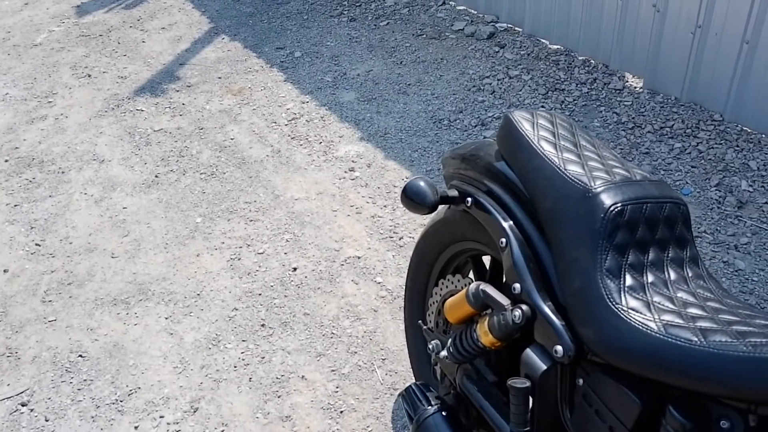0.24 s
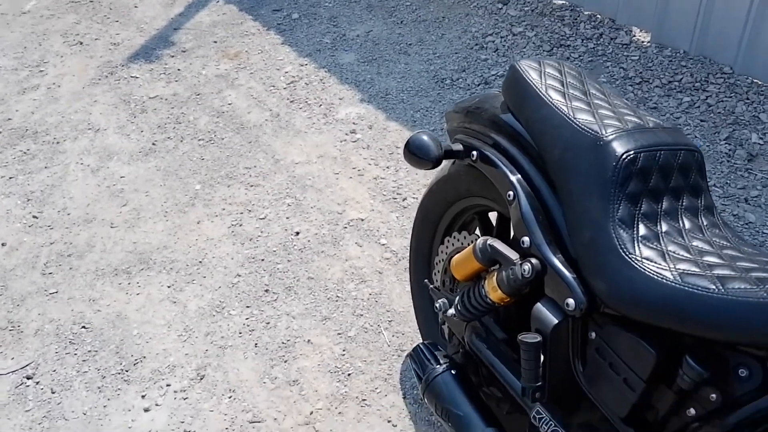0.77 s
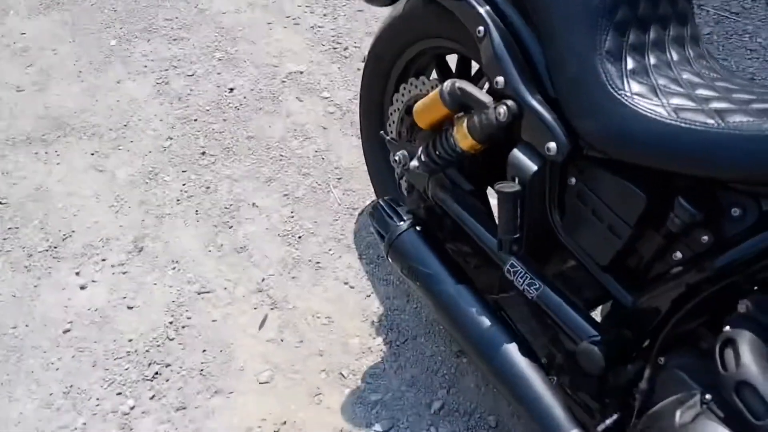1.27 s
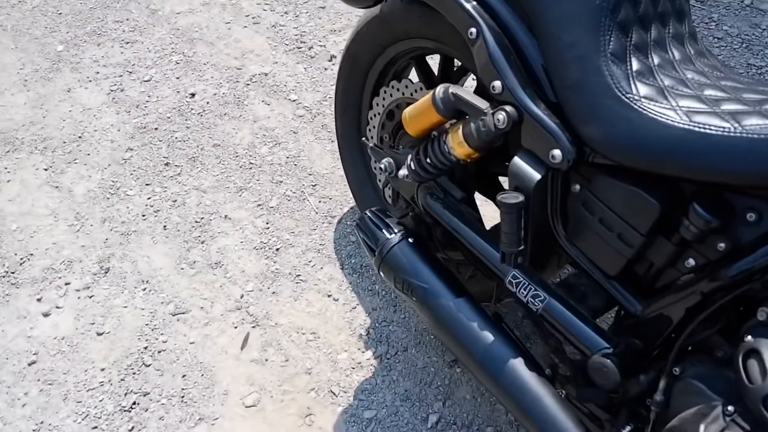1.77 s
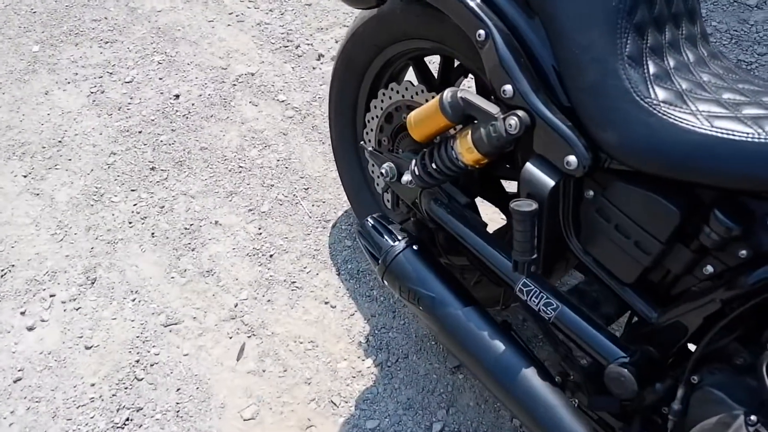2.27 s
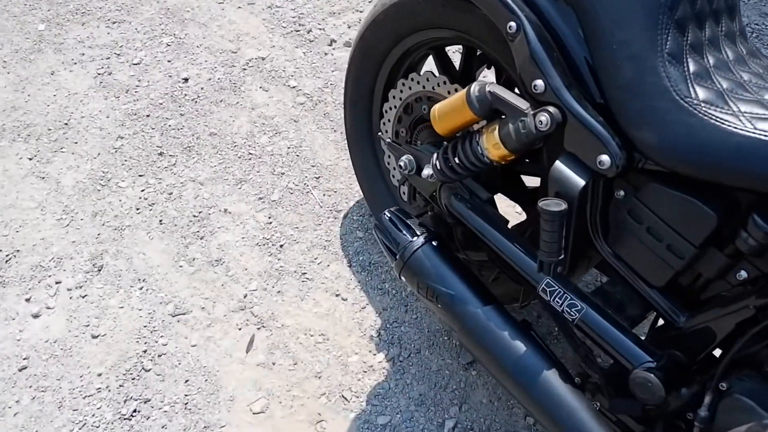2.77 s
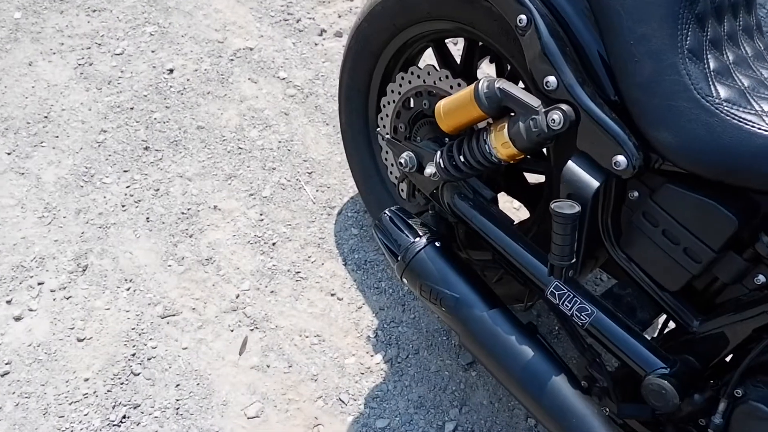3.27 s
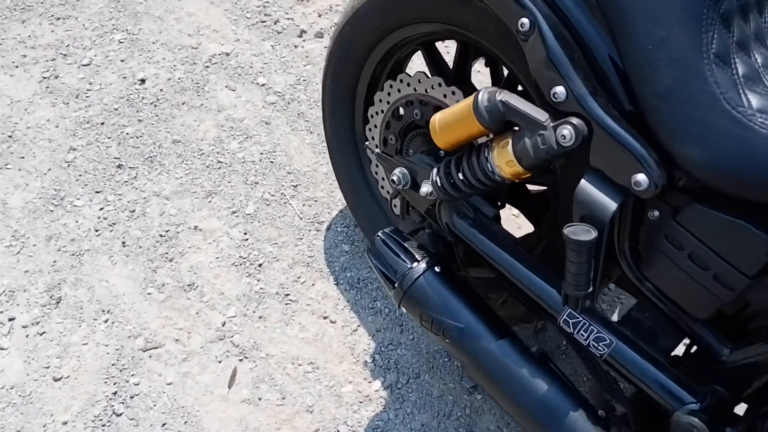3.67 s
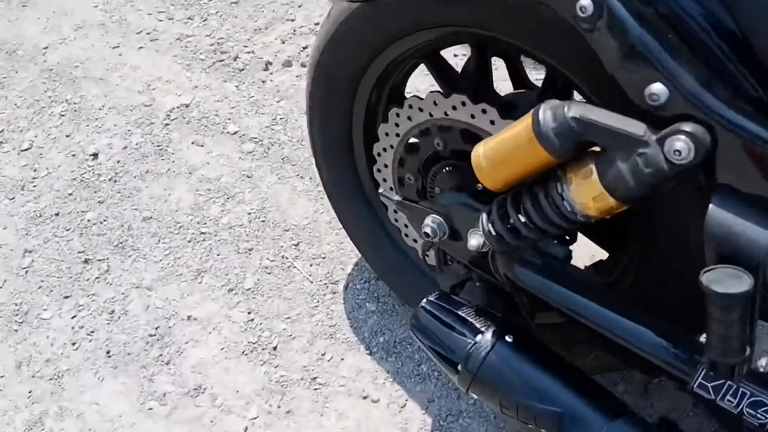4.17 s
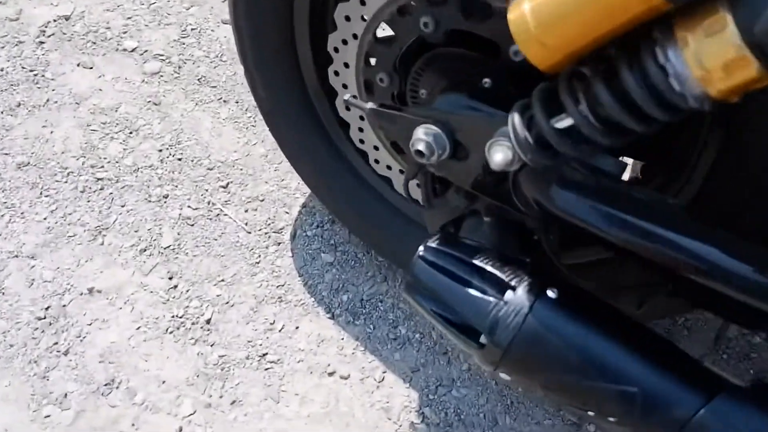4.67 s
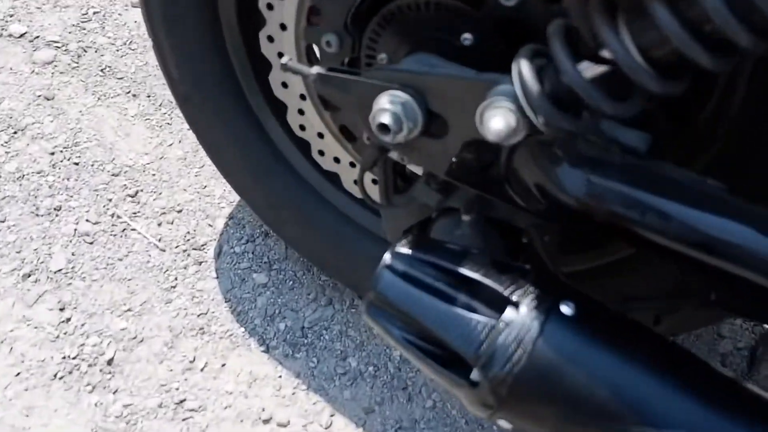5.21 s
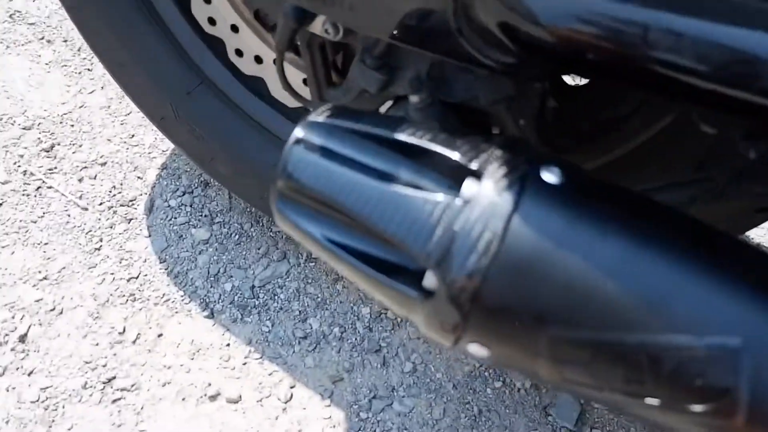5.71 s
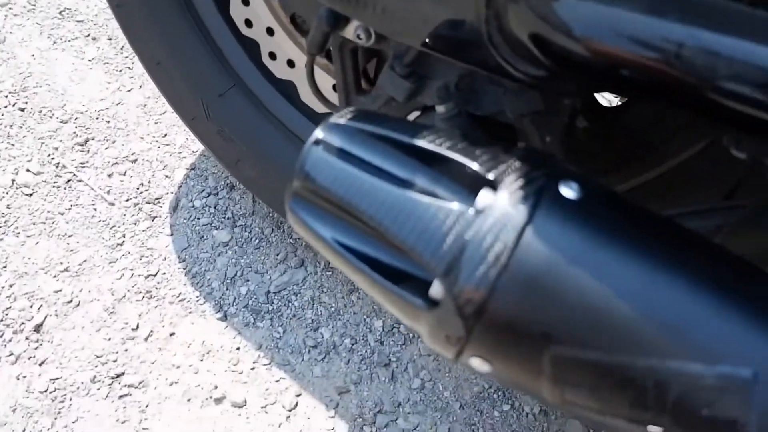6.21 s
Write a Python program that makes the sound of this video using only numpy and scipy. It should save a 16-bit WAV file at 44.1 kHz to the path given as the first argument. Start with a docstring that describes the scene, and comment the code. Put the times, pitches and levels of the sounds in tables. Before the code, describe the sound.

Close exhaust sound of a big twin-cylinder motorcycle: deep booms with hard barks and raspy gas. It is revved briefly, drops to a lumpy idle, then is blipped twice in a row to a low drone. A long crackling rundown follows before slow, irregular idle beats with occasional sputters. The open yard gives only faint, dull echoes; light mechanical ticking and hiss sit behind.

```python
"""A V-twin motorcycle stands on gravel beside a fence, heard from near the tip of its open muffler.
The throttle is blipped three times; the engine cracks, runs down with pops and settles into an uneven idle.
Each firing rings the pipe in a boom, a bark from its steep front and a rasp of gas; bangs lead with a shock.
Gas rumbles on between them, burbles and sputters through the muffler, and pushes at speed merge into a drone.
Behind it the valves tap, the fins sing, the intake hisses and air washes round the pipe; the yard echoes."""
import sys
import numpy as np
from scipy import signal
from scipy.fft import rfft, irfft, next_fast_len
from scipy.io import wavfile

SR = 44100
rng = np.random.default_rng(int(sys.argv[2]) if len(sys.argv) > 2 else 0)


def wav_record(signal):
    """Record a signal, one row per channel, as 16-bit PCM in the file named by sys.argv[1]."""
    frames = np.transpose(np.atleast_2d(signal))
    bounded = np.clip(frames, -1, 1)
    # unit amplitude maps onto the largest positive 16-bit level
    quanta = np.round(bounded * 32767).astype(np.int16)
    wavfile.write(sys.argv[1], SR, quanta)


N = 284439

# crank speed: (time [s], speed [rpm])
CRANK_SPEED = [(0.0, 1100), (0.12, 1624), (0.18, 2459), (0.47, 2221), (0.96, 1630), (1.34, 1310),
               (1.59, 1118), (1.79, 1516), (2.05, 3261), (2.21, 3601), (2.58, 2651), (2.75, 2865),
               (2.82, 3578), (2.93, 3712), (3.45, 2503), (4.32, 1290), (4.49, 1059), (5.09, 1009),
               (5.3, 1143), (5.43, 1053), (6.45, 1104)]
# gas pushes of the two cylinders in one cycle of two turns: (share at idle [cycle], share at revs [cycle],
# boom at idle [dB], boom at revs [dB], bark and rasp at idle [dB], bark and rasp at revs [dB])
FIRING_PUSHES = [(0, 0.017, 2, -1.5, -6, -4.5), (.42, .44, 1.5, 0, -8, -5.5)]
# throttle blips: (opens [s], shut [s], easing off [s], strength [dB], starving afterwards [dB])
THROTTLE_BLIPS = [(0.049, 0.229, 0.018, -3, -8), (1.7, 2.144, 0.054, -4, -6.5),
                  (2.687, 2.859, 0.026, -0.5, -7.5)]
# strength of a firing, throttle shut: (speed [rpm], boom [dB], bark [dB], rasp [dB])
SHUT_STRENGTH = [(1170, -13, -33, -35), (1350, -14, -40.5, -36.5), (1700, -12, -33.5, -36.5),
                 (2380, -13, -30.5, -34), (2630, -14, -36.5, -36.5), (3130, -13, -23.5, -30.5)]
# nearness of the microphone to the muffler: (time [s], exhaust level [dB])
MIC_NEARNESS = [(0, 8.5), (.6, -8), (1.2, 6.5), (4, -3), (4.9, 6), (6.45, 5)]
# firings sink and gas churns on the overrun: (speed [rpm], firing [dB], rumble re boom [dB])
OVERRUN_LEVELS = [(1130, -0.5, -15.5), (1227, -11.5, -6), (2020, -0.5, -3.5), (2520, -3, -15),
                  (3000, -3.5, -13.5)]
# level of the top end and intake hiss: (time [s], level [dB])
HISS_LEVEL = [(0, -15.5), (.55, -32.5), (1.45, -18.5), (2.05, -23), (2.7, -26.5), (3.2, -24), (4.4, -26),
              (5.3, -25), (5.65, -31), (6.45, -27.5)]
BOOM_VARY_DB, TIP_VARY_DB = 1.8, 3.5  # scatter of each mode from push to push


def from_db(db):
    """Amplitude factor of a level in dB."""
    return 10 ** (np.asarray(db) / 20)


def to_db(amplitude):
    """Level in dB of an amplitude factor."""
    return 20 * np.log10(amplitude)


def rms_one(x):
    """Scale a signal to an rms of one."""
    return x / np.sqrt(np.mean(x ** 2) + 1e-20)


def read(rows, at):
    """The columns of a curve, interpolated over its first column."""
    knots, *columns = np.transpose(rows)
    return [np.interp(at, knots, column) for column in columns]


def by_speed(rows, times):
    """The columns of a table over crank speed at the given times."""
    return np.array(read(rows, read(CRANK_SPEED, times)[0]))


def colour(x, spectrum):
    """Shape a signal by a spectrum in dB, interpolated over log frequency."""
    hz, db = np.transpose(spectrum)
    size = next_fast_len(N + 4096)
    bins = np.maximum(np.fft.rfftfreq(size, 1 / SR), 1)
    gain = from_db(np.interp(np.log(bins), np.log(hz), db))
    return irfft(rfft(x, size) * gain, size)[..., :N]


def noise(spectrum):
    """Coloured noise with an rms of one."""
    return rms_one(colour(rng.standard_normal(N), spectrum))


def stereo_noise(spectrum):
    """Coloured noise whose side signal, opposite left and right, has a spectrum of its own."""
    # width of the gas and engine noise: (frequency [Hz], side re mid [dB])
    width = [(100, -24), (500, -41.5), (1000, -16.5), (2000, -13), (4000, -15.5), (8000, -2), (12000, 4.5)]
    middle = noise(spectrum)
    side = colour(noise(spectrum), width)
    return middle + side * [[1], [-1]]


def lowpass(x, hz, order=2):
    """Take away what lies above a frequency."""
    return signal.sosfilt(signal.butter(order, min(hz, .45 * SR), fs=SR, output="sos"), x)


def highpass(x, hz, order):
    """Take away what lies below a frequency."""
    return signal.sosfilt(signal.butter(order, hz, "high", fs=SR, output="sos"), x)


def clicks(times, db):
    """One click of the given level at each time."""
    out = np.zeros(N)
    at = np.round(times * SR).astype(int)
    inside = (at >= 0) & (at < N)
    np.add.at(out, at[inside], from_db(db)[inside])
    return out


def play(train, response):
    """Sound a response at every click."""
    return signal.fftconvolve(train, response)[:N]


def puff_rms(response):
    """The rms of a response over its first 12 ms."""
    return np.sqrt(np.mean(response[:int(.012 * SR)] ** 2))


def pipe(times, db, modes, front_hz, order=2, vary_db=0):
    """Modes ring after each pressure front; a low front_hz is a soft front, and each favours other modes."""
    front = signal.unit_impulse(SR // 4)
    rings = []
    for hz, width, mode_db in modes:
        r = np.exp(-np.pi * width / SR)
        resonator = [1, -2 * r * np.cos(2 * np.pi * hz / SR), r * r]
        ring = signal.lfilter([1 - r * r, 0, r * r - 1], resonator, front + 1e-18)
        rings.append(from_db(mode_db) * lowpass(ring, front_hz, order))
    favour_db = vary_db * rng.standard_normal((len(times), len(modes))).T
    sounding = sum(play(clicks(times, db + own_db), ring) for own_db, ring in zip(favour_db, rings))
    return sounding / puff_rms(sum(rings))


def crank():
    """Engine cycles completed at each sample: the running sum of crank speed, two turns to a cycle."""
    start_cycle = -.16
    return start_cycle + np.cumsum(read(CRANK_SPEED, np.arange(N) / SR)[0]) / (2 * 60 * SR)


def crank_times(share):
    """When the crank passes this share of each cycle."""
    cycles = crank()
    return np.interp(np.arange(share, cycles[-1]), cycles, np.arange(N) / SR)


def revving(times):
    """0 at idle, 1 at high revs."""
    idle_rpm, rev_rpm = 1100, 2400
    return np.clip((read(CRANK_SPEED, times)[0] - idle_rpm) / (rev_rpm - idle_rpm), 0, 1)


def valve_times(share_idle, share_revs):
    """When a push leaves; at idle each firing speeds the crank up, so the next push comes early."""
    times = crank_times(max(share_idle, 0))
    cycle_s = 2 * 60 / read(CRANK_SPEED, times)[0]
    return times + (share_revs - share_idle) * revving(times) * cycle_s


def throttle(times):
    """Throttle opening from 0, shut, through a ramp up and a ramp down at each blip; 1 is wide open."""
    opening_s = .055
    opening = 0
    for opens, shut, easing, db, _ in THROTTLE_BLIPS:
        ramps = np.minimum((times - opens) / opening_s, (shut - times) / easing)
        opening = opening + from_db(db) * np.clip(ramps, 0, 1)
    return opening


def coasting_db(times):
    """Exhaust level by nearness; the cylinders starve for a moment after the throttle snaps shut."""
    starve_s = .097
    starved_db = 0
    for _, shut, _, _, db in THROTTLE_BLIPS:
        starved_db = starved_db + db * (times > shut) * np.exp(-np.abs(times - shut) / starve_s)
    return starved_db + read(MIC_NEARNESS, times)[0]


def misfire_db(times):
    """A charge that catches weakly or not at all weakens its firing and the afterpuff behind it."""
    # weak firings: (time [s], change of level [dB])
    weak_firings = [(0.017, -0.5), (1.255, -1), (1.73, -34), (4.28, -28), (4.385, -34), (4.433, -3),
                    (4.546, -28), (4.708, -8.5), (4.94, -19), (5.174, -6.5), (5.392, -7), (5.565, -7),
                    (5.62, -15), (5.682, -5)]
    return sum(db * (np.abs(times - s - .009) < .016) for s, db in weak_firings)


def unevenness(times):
    """Share of the scatter: coasting fast, the engine only pumps air evenly; burning charges always vary."""
    # scatter left off the throttle: (speed [rpm], share [1])
    scatter_left = [(1150, .85), (1400, 1), (2450, 1), (2800, .25)]
    return np.maximum(by_speed(scatter_left, times)[0], throttle(times))


def pushes(pattern, scatter_s):
    """Times and levels (boom, bark, rasp) of the pushes that the turning crank lets out."""
    burn_vary_db, gas_vary_db = 1.5, 2.8  # scatter from one charge to the next
    rows = []
    for share_idle, share_revs, boom_idle, boom_revs, edge_idle, edge_revs in pattern:
        times = valve_times(share_idle, share_revs)
        revs = revving(times) ** 2
        boom, bark, rasp = by_speed(SHUT_STRENGTH, times) + coasting_db(times) + misfire_db(times)
        push = boom_idle + revs * (boom_revs - boom_idle)
        edge = edge_idle + revs * (edge_revs - edge_idle)
        scatter = rng.standard_normal((len(times), 3)) * [scatter_s, burn_vary_db, gas_vary_db]
        late_s, burn_db, gas_db = scatter.T
        uneven = unevenness(times)
        rows.append([times + uneven * late_s,
                     boom + push + uneven * burn_db,
                     bark + edge + uneven * burn_db,
                     rasp + edge + gas_db])
    return np.hstack(rows)


def full_charges():
    """Times and levels (boom, bark, rasp) of the firings under open throttle and of the single loud bangs."""
    # strength of a firing, throttle open: (speed [rpm], boom [dB], bark [dB], rasp [dB])
    open_strength = [(1210, -8.5, -15, -27), (2540, -19, -18.5, -31), (4430, -21.5, -14, -37)]
    # single loud bangs: hard firings, strong idle beats and pops in the pipe:
    # (time [s], boom [dB], bark [dB], rasp [dB])
    single_bangs = [(0.056, -10, -31, -56), (0.135, -36, -22, -45), (0.19, -30, -23, -36),
                    (0.351, -24, -37, -49.5), (.395, -30, -47, -51), (0.531, -29, -42, -51),
                    (0.555, -22.5, -34, -52), (0.732, -20, -32, -60), (1.174, -16, -38, -53.5),
                    (1.216, -13.5, -40, -69), (1.395, -12.5, -37, -60), (1.491, -8.5, -39, -55),
                    (1.599, -11.5, -48, -44), (1.679, -21, -20.5, -45), (1.694, -9.5, -13.5, -35.5),
                    (1.851, -33, -14.5, -40), (1.876, -35, -35, -46), (2.157, -43, -18.5, -65),
                    (2.529, -17, -23.5, -69), (2.576, -17, -40, -46.5), (2.622, -16, -48, -44.5),
                    (2.707, -11, -22, -66), (2.775, -35, -20.5, -41.5), (3.243, -15.5, -52, -45),
                    (3.288, -18, -29, -42.5), (3.33, -16.5, -36, -44), (3.416, -18, -43, -42.5),
                    (3.464, -15.5, -38, -41.5), (3.512, -19, -39, -43), (3.617, -16.5, -42, -42),
                    (3.795, -18.5, -33.5, -48), (3.91, -16, -36, -46.5), (4.044, -18, -44, -47.5),
                    (3.969, -15, -30, -52), (4.157, -10.5, -20.5, -43.5), (4.192, -10, -23, -39),
                    (4.335, -19, -30.5, -48.5), (4.478, -11.5, -32, -47.5), (4.822, -9.5, -44, -45.5),
                    (5.058, -11, -49, -43), (5.344, -11, -36, -59), (5.5, -8.5, -27.5, -43.5),
                    (5.796, -12.5, -25, -49.5), (6.018, -13, -31, -56)]
    powers = [.29, .34, 2.3]  # a part-open throttle gives this power of the full boom, bark and rasp
    times = np.concatenate([valve_times(*firing[:2]) for firing in FIRING_PUSHES])
    times = times[throttle(times) > .1]
    opening_db = to_db(throttle(times))
    levels = by_speed(open_strength, times) + np.outer(powers, opening_db) + misfire_db(times)
    return np.hstack([np.vstack([times, levels]), np.transpose(single_bangs)])


def booms(times, db, ringing_db):
    """The thud of the pipe and its longer ring; a push lasts a fixed crank angle, so it is shorter at speed."""
    # pipe resonances under long, slow pushes: (frequency [Hz], width [Hz], level [dB])
    slow_modes = [(66, 4.8, -2), (134, 36, 6.5), (166.5, 31, 3), (224.5, 150, 2.5), (305, 13, -16)]
    # pipe resonances under short, fast pushes: (frequency [Hz], width [Hz], level [dB])
    fast_modes = [(122.5, 37, 11), (193, 110, 5), (258, 120, 1), (328, 26, 7.5)]
    # standing wave in the pipe: (speed [rpm], long ring re boom [dB])
    standing_wave = [(990, -9.5), (1240, -2.5), (1900, -9.5), (2110, -21.5), (3170, -13.5)]
    ring_loss_per_db = 1.5  # close to the tip the direct thud drowns the ring
    revs = np.clip(revving(times), .001, .999)
    vary_db = BOOM_VARY_DB * unevenness(times)
    slow = pipe(times, db + to_db(1 - revs), slow_modes, front_hz=238.3, order=4, vary_db=vary_db)
    fast = pipe(times, db + to_db(revs), fast_modes, front_hz=307.4, order=4, vary_db=vary_db)
    fast = highpass(fast, 85, order=2)  # short pushes carry little deep bass
    near_db = read(MIC_NEARNESS, times)[0]
    ring_db = ringing_db + by_speed(standing_wave, times)[0] - ring_loss_per_db * near_db
    ring = pipe(times, db + ring_db, [(142.4, 1.93, 0)], front_hz=220)
    return -(slow + fast + ring)


def barks(times, db, front_hz, idle_db, tip_db, idle_tip_db):
    """A steep front rings the higher pipe modes; at idle the knock of the end can takes over."""
    # pipe resonances under a steep front: (frequency [Hz], width [Hz], level [dB])
    bark_modes = [(336.5, 24, 4), (445, 22.4, 13), (512, 90, 2), (574, 32, 1.5)]
    # the end can of the muffler at revs: (frequency [Hz], width [Hz], level [dB])
    tip_modes = [(851, 98, 8.5), (1026, 130, 3.5), (1622, 95, 7.5), (2500, 150, 1.5)]
    # knock of the end can at idle: (frequency [Hz], width [Hz], level [dB])
    knock_modes = [(793, 65, 7), (935, 45, 8), (1240, 67, 9.5), (1700, 39, -1.5)]
    idling = np.clip((1 - revving(times)) ** 3, .001, .999)
    uneven = unevenness(times)
    body = pipe(times, db + idle_db * idling, bark_modes, front_hz, order=6, vary_db=BOOM_VARY_DB * uneven)
    at_tip = times + .00077
    revs_db = db + tip_db + 10 * np.log10(1 - idling)
    tip = pipe(at_tip, revs_db, tip_modes, front_hz=1600, vary_db=TIP_VARY_DB * uneven)
    knock_db = db + idle_tip_db + 10 * np.log10(idling)
    knock = pipe(at_tip, knock_db, knock_modes, front_hz=1630, vary_db=TIP_VARY_DB * uneven)
    return body + tip + knock


def jet(times, db, decay_s):
    """Bursts of turbulence that swell as the valve cracks open and die after each push."""
    # turbulent gas at the tip: (frequency [Hz], density [dB per Hz])
    gas_spectrum = [(60, -32.5), (300, 5), (600, -5), (950, 4), (1300, -1), (1620, 5.5), (1950, -2.5),
                    (2550, 3), (3100, -4.5), (3700, -7), (4400, -5), (5300, -7.5), (7500, -14),
                    (9000, -23.5), (11500, -23.5)]
    t = np.arange(SR // 10) / SR
    swell = 1 / (1 + np.exp((.003 - t) / .0006))
    burst = swell * np.exp(-t / decay_s)
    burst_power = (burst / puff_rms(burst)) ** 2
    gas_power = play(clicks(times - .002, 2 * db), burst_power)
    return np.sqrt(np.maximum(gas_power, 0)) * stereo_noise(gas_spectrum)


def cracks(times, db):
    """At idle the steep front of each firing is heard straight from the tip as a dry crack."""
    # the dry crack: (frequency [Hz], width [Hz], level [dB])
    crack_modes = [(800, 540, 0)]
    crack_db, lag_s = 1, .001005  # level re bark
    idling = np.clip(1 - revving(times), .001, 1)
    return -pipe(times + lag_s, db + crack_db + to_db(idling), crack_modes, front_hz=1740, order=4)


def rumble(times, db):
    """Gas churns on after each push and keeps the low pipe modes sounding, so slow pushes run together."""
    # colour of the churning: (frequency [Hz], density [dB per Hz])
    churn_spectrum = [(30, -41), (55, -4), (105, -8), (140, 7), (185, -8.5), (265, -4.5), (400, -25.5),
                      (800, -61.5)]
    peak_s = .014  # its power peaks this long after a push
    t = np.arange(SR // 4) / SR
    churn_power = t / peak_s * np.exp(1 - t / peak_s)
    push_db = db + by_speed(OVERRUN_LEVELS, times)[1]
    power = play(clicks(times, 2 * push_db), churn_power)
    return np.sqrt(np.maximum(power, 0)) * noise(churn_spectrum)


def running():
    """Ordinary firings and afterpuffs; a bang takes the place of the firing it falls on, but not of its crack."""
    # the rising pistons push out the rest of the gas: (share at idle [cycle], share at revs [cycle],
    # boom at idle [dB], boom at revs [dB], bark and rasp at idle [dB], bark and rasp at revs [dB])
    afterpuffs = [(.15, .19, -6.5, -9, -8.5, -1.5), (.275, .275, -6, -9.5, -11, -12),
                  (.328, .328, -8, -16, -22, -25), (.565, .6, -3.5, -28.5, -9.5, -3.5)]
    puff_on_throttle_db = -7  # a hard firing leaves little gas for the afterpuffs
    fired = pushes(FIRING_PUSHES, scatter_s=.00015)
    fired[1] += by_speed(OVERRUN_LEVELS, fired[0])[0]
    puffs = pushes(afterpuffs, scatter_s=.0005)
    puffs[1:] += puff_on_throttle_db * throttle(puffs[0])
    nearest_bang_s = np.abs(fired[0][:, None] - full_charges()[0]).min(axis=1)
    ordinary = nearest_bang_s > .007
    times, boom_db, bark_db, rasp_db = np.hstack([fired[:, ordinary], puffs])
    boom = from_db(-2.5) * booms(times - .0007, boom_db, ringing_db=-3.5)
    bark = from_db(-1) * barks(times, bark_db, front_hz=643, idle_db=-18.5, tip_db=-8.5, idle_tip_db=-2)
    rasp = from_db(-5) * jet(times, rasp_db, decay_s=.0052)
    churning = rumble(times, boom_db + to_db(unevenness(times)))
    return boom - bark + rasp + cracks(fired[0], fired[2]) + churning


def sputter(level, per_s, modes):
    """A dense run of small uneven bursts of gas, each ringing the muffler."""
    times = np.sort(rng.uniform(0, N / SR, int(per_s * N / SR)))
    db = read(level, times)[0] + 3 * rng.standard_normal(len(times))
    return pipe(times, db, modes, front_hz=4000, vary_db=TIP_VARY_DB)


def burble():
    """The pipe burbles as the first blip runs down: random bursts of gas ring it."""
    # level of one burst: (time [s], level [dB])
    burst_level = [(0, -37), (.3, -40), (.7, -51.5), (1.25, -43), (1.6, -42), (1.9, -66)]
    # what it rings: (frequency [Hz], width [Hz], level [dB])
    burst_modes = [(500, 150, 7.5), (996, 67, 1), (1640, 73, -14)]
    return sputter(burst_level, 110, burst_modes)


def valve_gear():
    """The valves tap lightly and unevenly and ring the cylinder heads."""
    # when the valves tap: one list of shares [cycle]
    tap_shares = [.07, .33, .49, .75, .91]
    # ring of the cylinder heads: (frequency [Hz], width [Hz], level [dB])
    head_modes = [(1010, 43, 1), (2440, 41, -8), (2683, 36, 3.5), (5130, 200, -1.5)]
    tap_db = -16  # re the hiss curve
    times = np.concatenate([crank_times(share) for share in tap_shares])
    db = read(HISS_LEVEL, times)[0] + tap_db + 3 * rng.standard_normal(len(times))
    return pipe(times, db, head_modes, front_hz=6000)


def engine_noise():
    """Valve gear, fins and intake hiss to the right; air churns round the pipe with the firing strength."""
    # colour of the top end and intake hiss: (frequency [Hz], density [dB per Hz])
    hiss_spectrum = [(290, 2.5), (500, -4), (1070, -9.5), (1910, -16), (2300, -15.5), (2700, -16),
                     (3150, -20.5), (3690, -29), (4300, -19), (4960, -21), (5790, -27), (8210, -30.5),
                     (10500, -41), (14200, -48.5)]
    # the cooling fins sing faintly: (frequency [Hz], density [dB per Hz])
    fin_spectrum = [(2000, -60), (2540, -16), (2665, 0), (2780, -16), (3400, -60)]
    # level of their singing: (time [s], level [dB])
    fin_level = [(0, -62), (.75, -54), (1.1, -54), (1.5, -62), (6.45, -66)]
    # low wash of air round the pipe: (frequency [Hz], density [dB per Hz])
    wash_spectrum = [(15, -44), (35, -38), (60, 2.5), (140, 4), (260, -7.5), (600, -30), (1200, -45.5),
                     (4000, -89.5)]
    t = np.arange(N) / SR
    hiss = from_db(read(HISS_LEVEL, t)[0] - 9) * stereo_noise(hiss_spectrum)
    taps = from_db(-19) * valve_gear()
    singing = from_db(read(fin_level, t)[0]) * noise(fin_spectrum)
    wash = from_db(by_speed(SHUT_STRENGTH, t)[0] - 17) * unevenness(t) * noise(wash_spectrum)
    return (hiss + taps + singing) * from_db([[-1.2], [1]]) + wash


def shocks(times, db):
    """A swing of over- and underpressure leads each bang and comes back inverted from a trip along the pipe."""
    # the shock at the head of a bang: (time [s], length [s], level re bark [dB])
    shock_shape = [(.2, 0.0023, 14), (1.8, 0.0029, 12.5), (4.198, 0.0019, 5.5), (5.093, 0.00061, 3.5)]
    lead_s, trip_s, return_db = .00081, .0101, -7
    out = np.zeros(N)
    t = np.arange(SR // 50) / SR
    starts = times - lead_s
    for s, bark_db, length_s, shock_db in zip(starts, db, *read(shock_shape, times)):
        phases = np.clip([t / length_s, (t - trip_s) / length_s], 0, 1)  # one cycle each
        swing, back = np.sin(2 * np.pi * phases)
        at = int(s * SR)
        out[at:at + len(t)] += from_db(bark_db + shock_db) * (swing - from_db(return_db) * back)
    return out


def bangs():
    """A full charge steepens into a shock: a hard bark, with a jet tearing out behind it."""
    times, boom_db, bark_db, rasp_db = full_charges()
    boom = from_db(3.5) * booms(times + .00017, boom_db, ringing_db=-8)
    bark = from_db(.5) * barks(times, bark_db, front_hz=559, idle_db=-5.5, tip_db=-11, idle_tip_db=-8)
    rasp = from_db(13.5) * jet(times + .00061, rasp_db, decay_s=.0071)
    return shocks(times, bark_db) + boom + bark + rasp


def pings():
    """A sharp bang sets single modes of the pipe or its end can ringing."""
    # single modes: (time [s], frequency [Hz], width [Hz], level [dB])
    single_modes = [(.136, 456, 58, -13), (.191, 420, 58, -22), (3.047, 1580, 80, -37),
                    (3.968, 326, 50, -11), (3.968, 431, 69.4, -14), (3.969, 900, 199, -27.5),
                    (3.968, 1800, 200, -46), (4.194, 563, 58, -19.5), (4.195, 394, 58, -18.5),
                    (4.479, 710, 400, -29.5), (4.482, 1620, 111, -27.5), (4.479, 2430, 220, -38),
                    (5.061, 960, 150, -30), (5.348, 1220, 200, -30.5), (5.5, 1150, 200, -41)]
    return sum(pipe(np.array([s]), np.array([db]), [(hz, width, 0)], front_hz=1.57 * hz, order=3)
               for s, hz, width, db in single_modes)


def drone():
    """At speed the even pushes of both cylinders merge into standing waves on multiples of the cycle rate."""
    # waves of the drone: (multiple of the cycle rate [1], level [dB])
    multiples = [(3, -8), (4, 4.5), (5, -1), (6, 1), (7, -2.5), (9, 1.5), (11, -2.5), (12, -7.5), (16, -14),
                 (18, -17.5), (20, -17.5)]
    # strength of the drone: (speed [rpm], level [dB])
    speed_level = [(1800, -45), (2200, -27), (2650, -25), (2950, -20), (3700, -19)]
    on_throttle_db = -17.5  # hard firings break up the standing waves
    t = np.arange(N) / SR
    cycles = crank()
    waves = np.zeros(N)
    for multiple, db in multiples:
        for firing in FIRING_PUSHES:
            waves += from_db(db) * np.sin(2 * np.pi * round(multiple) * (cycles - firing[1]))
    level_db = by_speed(speed_level, t)[0] + coasting_db(t) + on_throttle_db * throttle(t)
    return -from_db(level_db) * rms_one(waves)


def grit():
    """Gas sputters through the end can at the late idle: random bursts ring it."""
    # level of one burst: (time [s], level [dB])
    burst_level = [(4.4, -86), (4.75, -47), (5.02, -52), (5.38, -49), (5.55, -58), (5.9, -51.5),
                   (6.45, -56)]
    # what it rings: (frequency [Hz], width [Hz], level [dB])
    burst_modes = [(880, 62, 5), (1280, 570, -4.5), (1500, 160, -12.5), (2520, 160, -11.5)]
    return sputter(burst_level, 350, burst_modes)


def yard(x):
    """A few dull echoes from ground and fence, which matter less close to the muffler."""
    # echoes: (delay [s], level [dB])
    reflections = [(.0032, -34), (0.0181, -16.5), (.029, -25)]
    loss_per_db = 1  # dB of echo lost per dB of nearness
    near_db = read(MIC_NEARNESS, np.arange(N) / SR)[0]
    dull = lowpass(x, hz=4500, order=1) * from_db(-loss_per_db * near_db)
    echoes = sum(from_db(db) * np.pad(dull, ((0, 0), (int(s * SR), 0)))[:, :N] for s, db in reflections)
    return x + echoes


def scene():
    """Exhaust in the yard, drone and engine, a little to the right of the microphone."""
    exhaust = running() + burble() + bangs() + pings() + grit()
    return (yard(exhaust) + drone() + engine_noise()) * from_db([[-.2], [.2]])


def record(dry):
    """The microphone loses the deep bass and the top; the hardest peaks are squashed."""
    heard = lowpass(highpass(dry, 41, order=3), hz=10000, order=10)
    squashed = heard / (1 + (heard / 1.02) ** 6) ** (1 / 6)
    cutoff = signal.cheby2(12, 60, 15800, fs=SR, output="sos")  # stopband edge in Hz
    return signal.sosfilt(cutoff, squashed)


dry = scene()
out = record(dry)
wav_record(out)
```